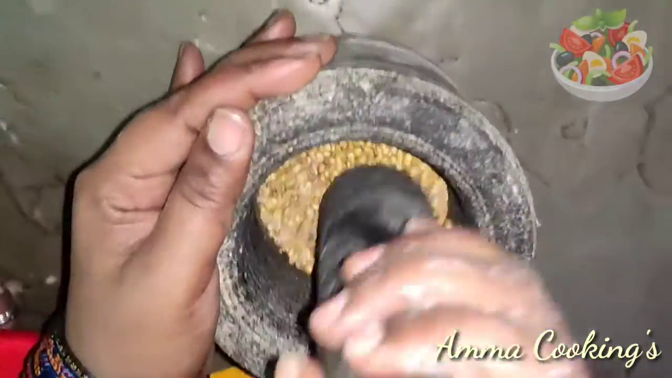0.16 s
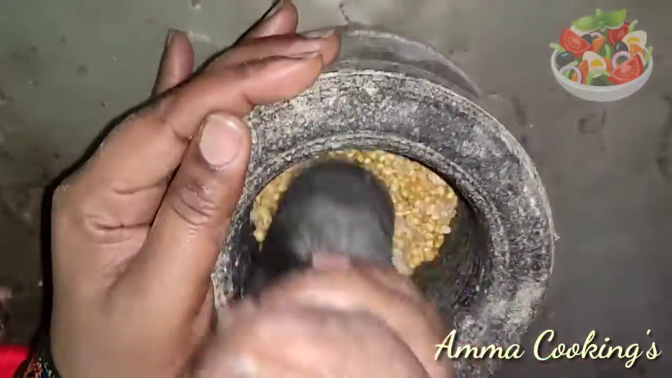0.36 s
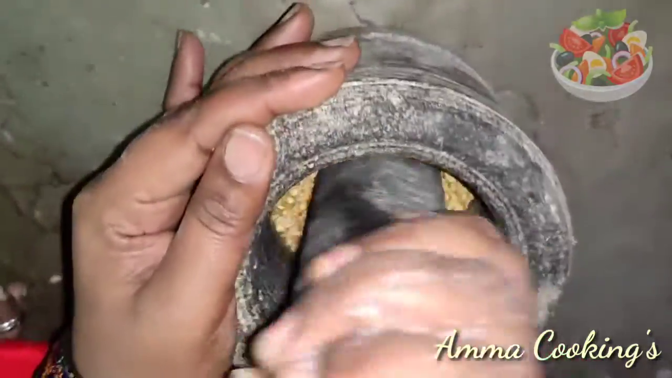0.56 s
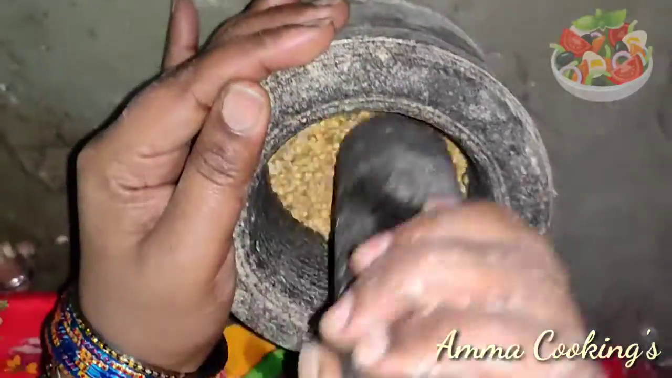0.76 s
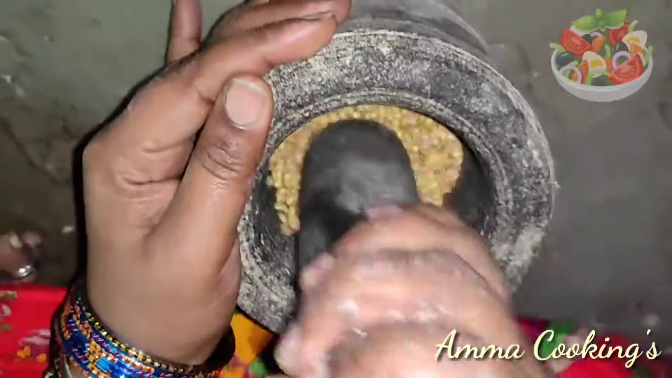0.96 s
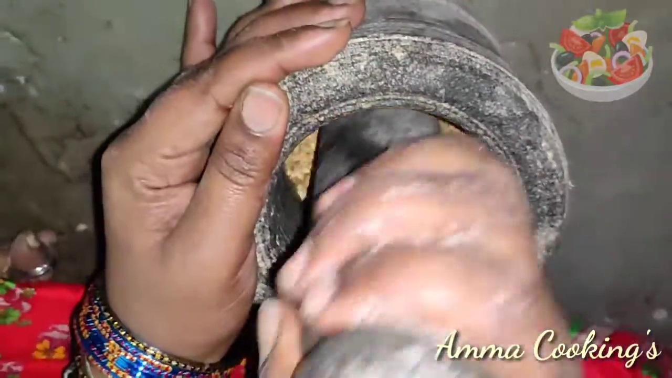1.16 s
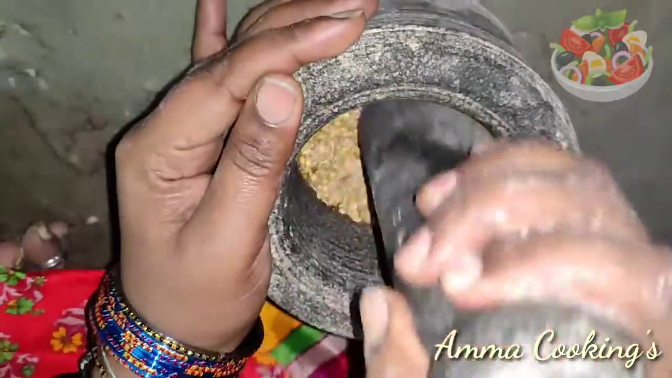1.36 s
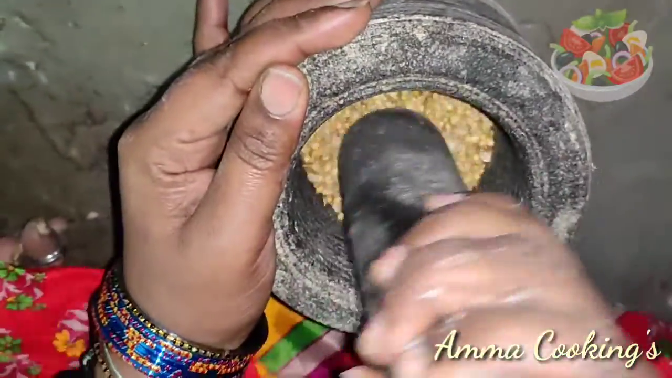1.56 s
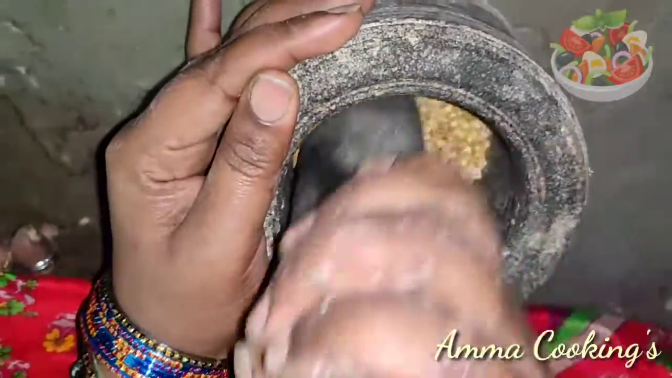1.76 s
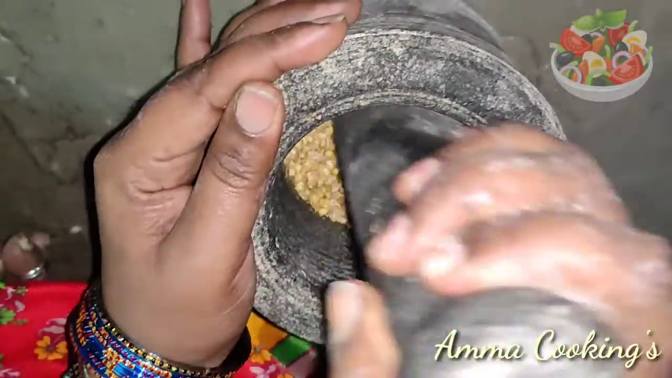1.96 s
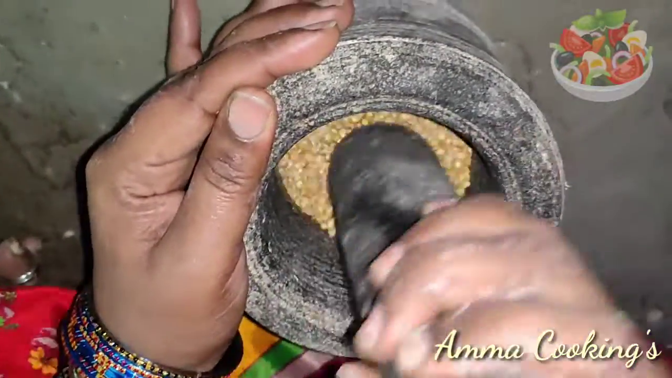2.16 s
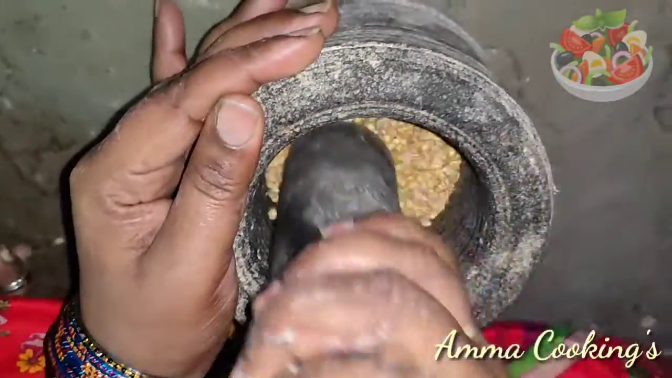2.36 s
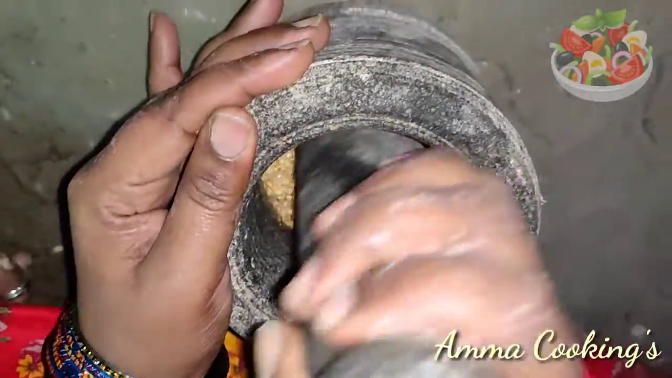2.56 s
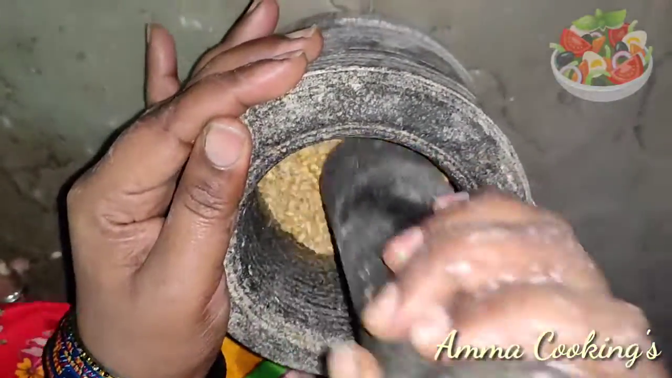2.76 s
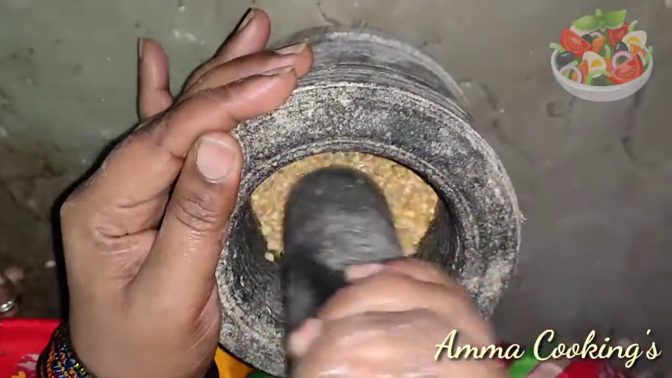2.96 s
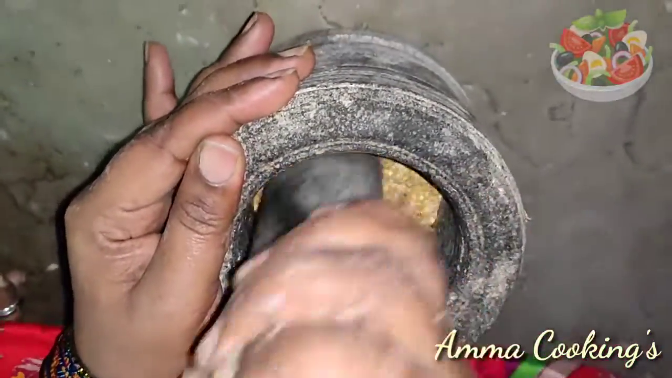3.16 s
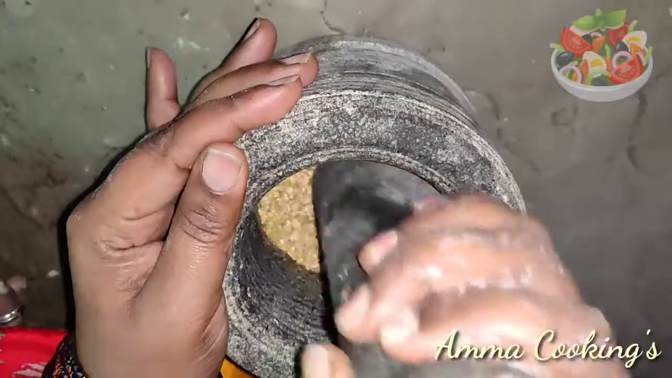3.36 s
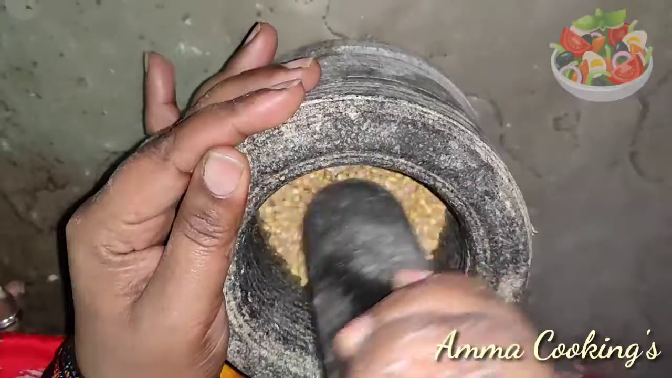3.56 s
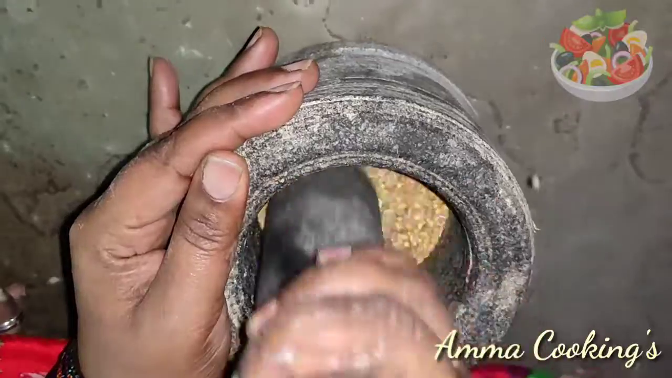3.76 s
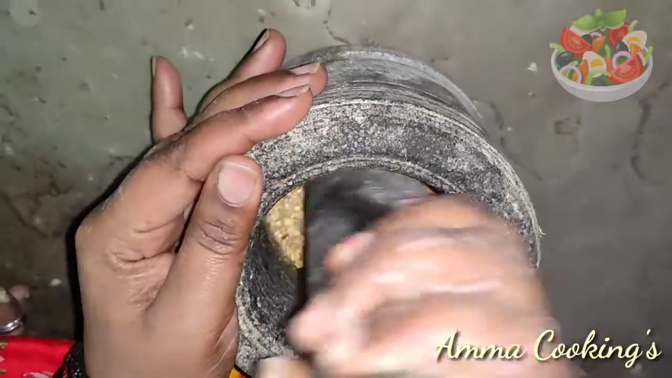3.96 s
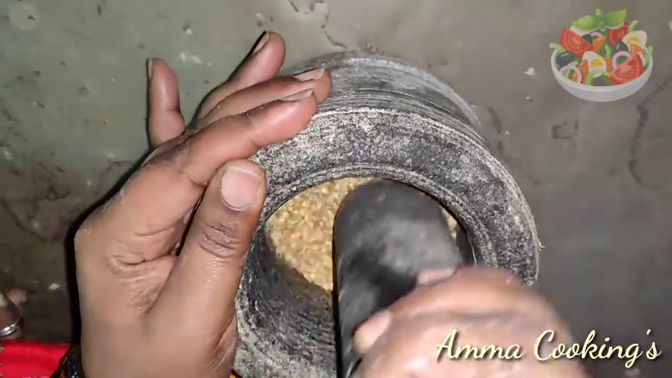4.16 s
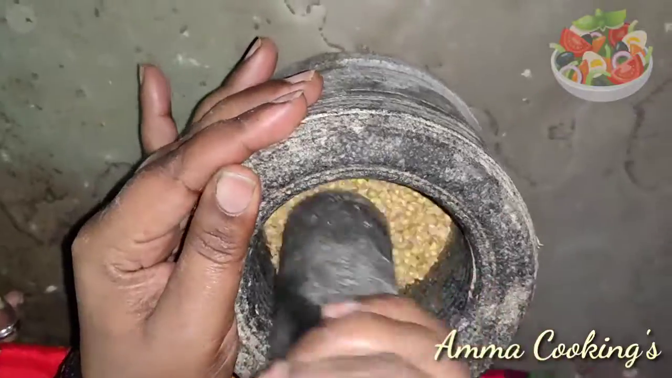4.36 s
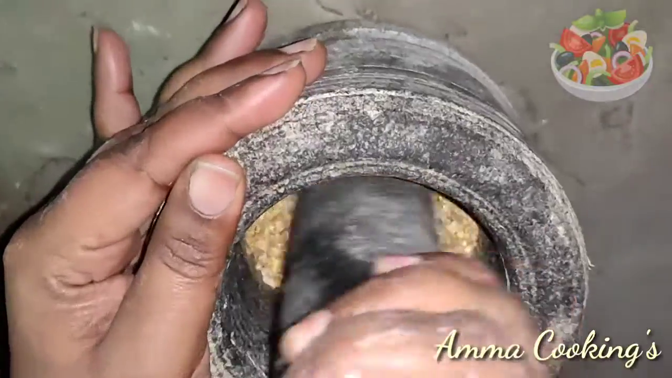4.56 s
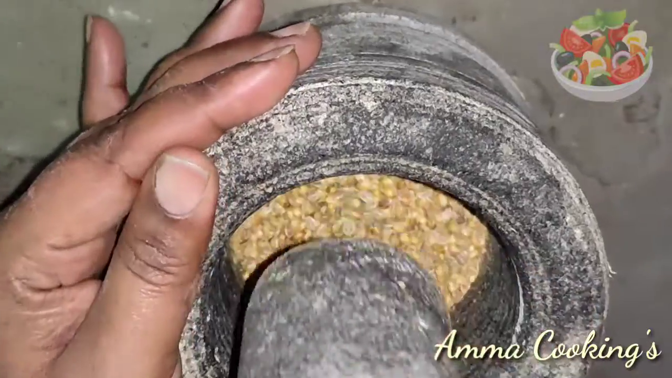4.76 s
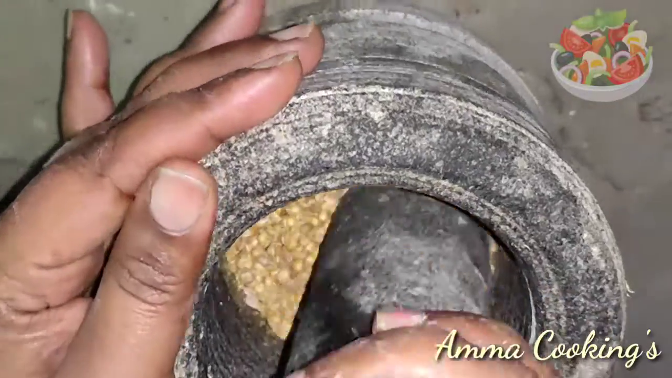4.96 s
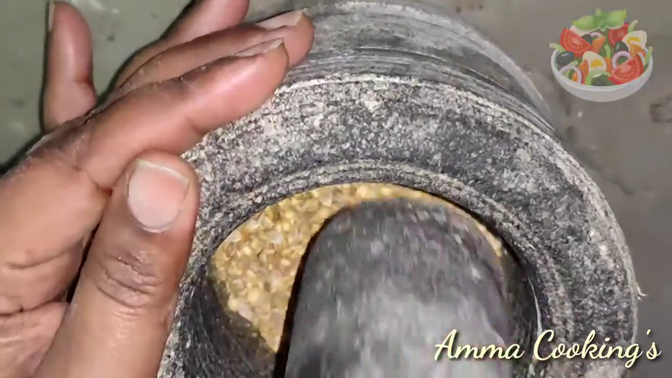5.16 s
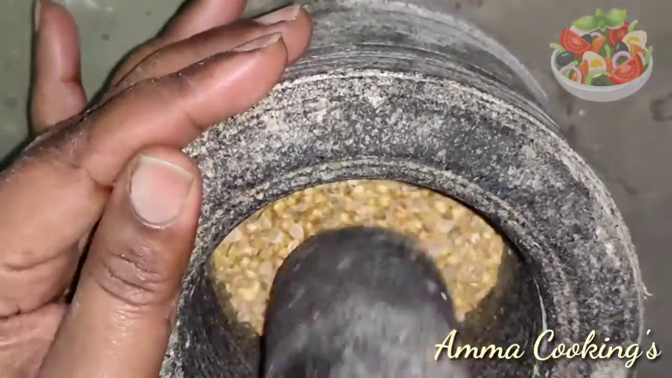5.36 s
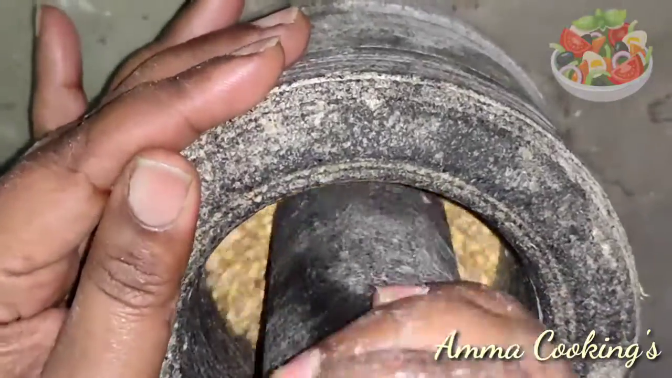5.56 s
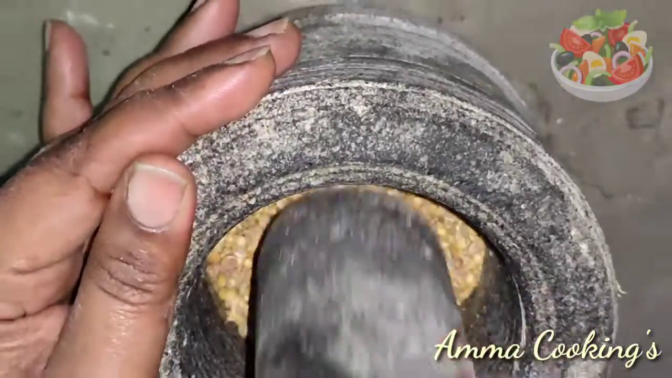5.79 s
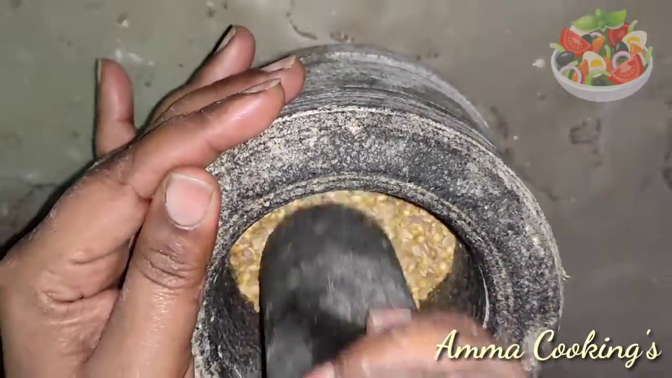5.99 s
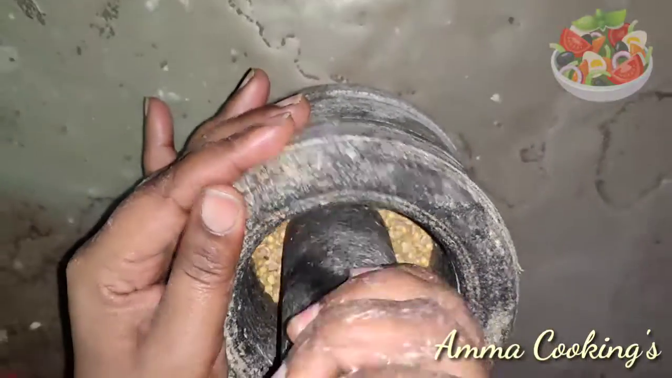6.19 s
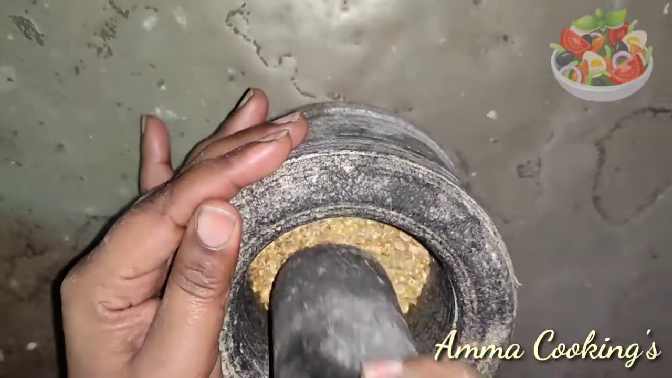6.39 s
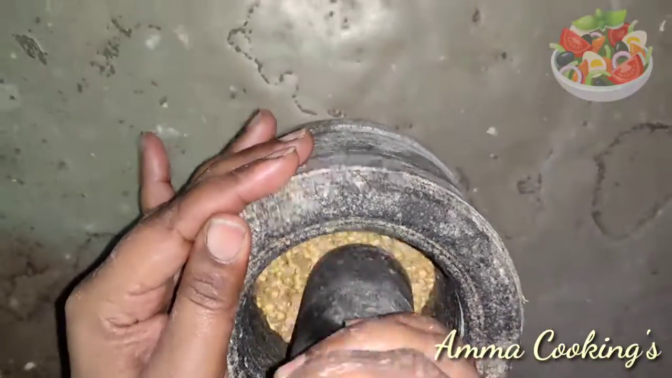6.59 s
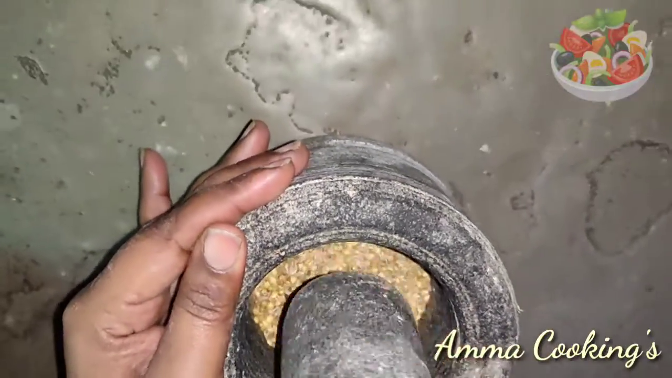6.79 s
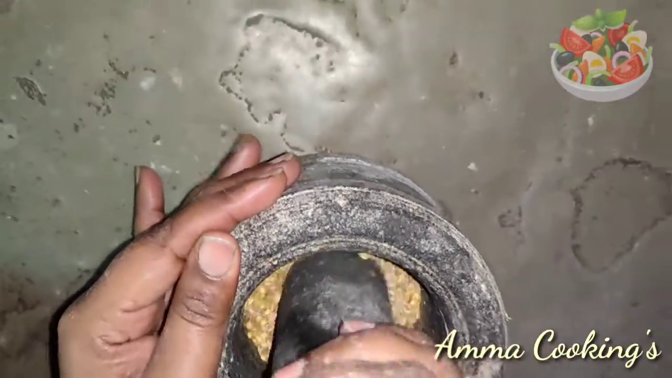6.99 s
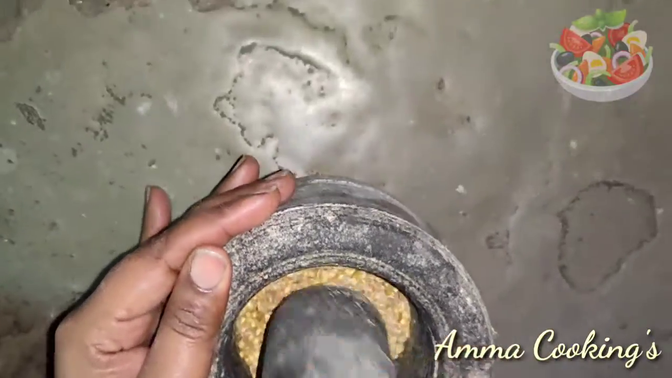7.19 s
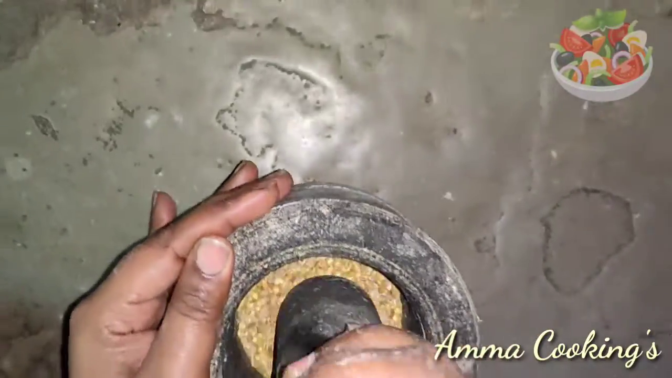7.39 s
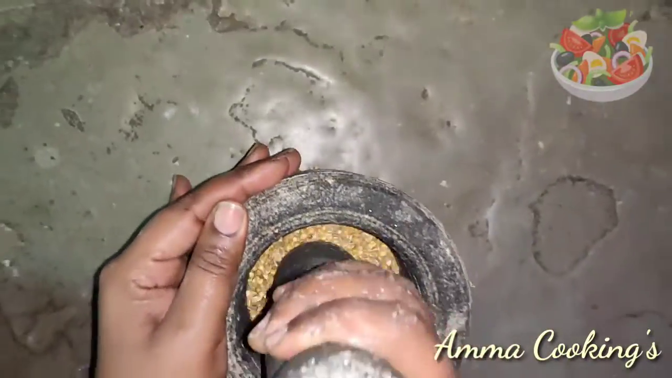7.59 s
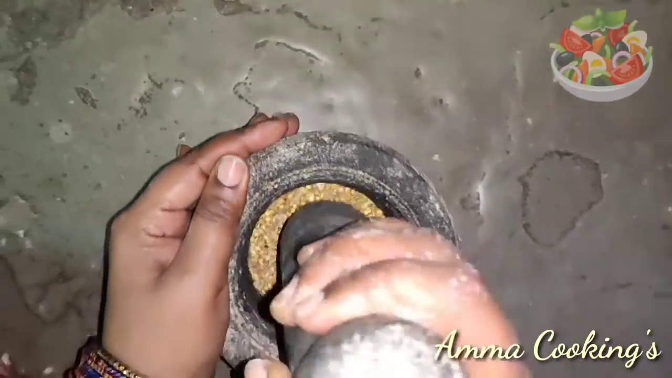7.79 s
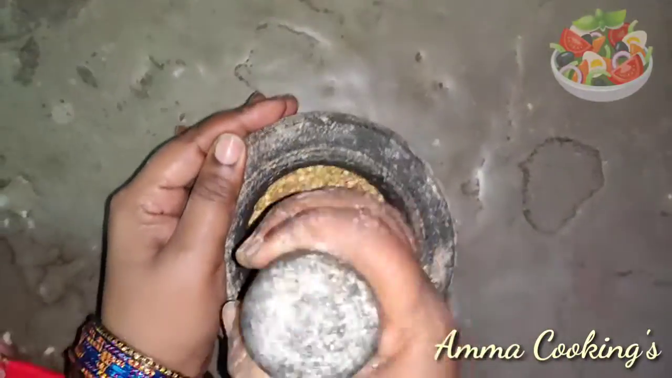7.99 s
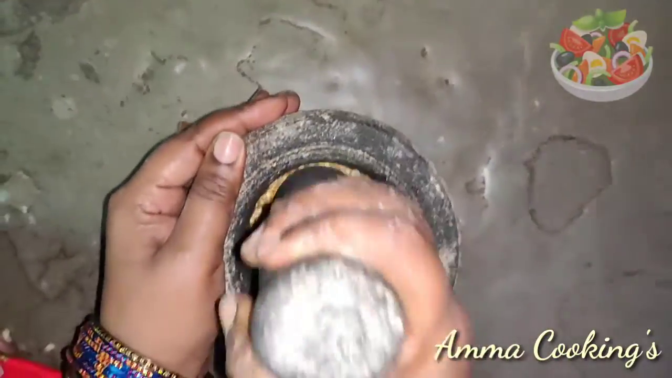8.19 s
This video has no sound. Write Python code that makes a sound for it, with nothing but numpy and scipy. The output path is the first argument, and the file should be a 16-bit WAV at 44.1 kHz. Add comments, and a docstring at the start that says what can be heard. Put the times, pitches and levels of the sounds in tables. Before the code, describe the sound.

A small room with a soft airy noise and low hum, heard close from above in stereo. From 0 to 0.6 seconds a stone pestle makes several quick clacks and knocks in a stone mortar, with small seed cracks. From about 0.7 to 4.5 seconds it grinds seeds: a dry, gritty, bright scrape swelling every 0.3 seconds or so, with irregular hollow taps, stronger ones near 2.8, 3.1, 3.9 and 4.2, and faint pestle pings. The scraping stops around 4.6 with a sharp rim clack. From 4.96 to 7.96 ten heavy blows fall roughly every 0.33 seconds, each a brief crunch, damped stone knock with small bounces and usually a deep floor thud; the one at 6.6 is more stony, less deep. Low room resonance lingers. Faint glass bangles tinkle and seeds slide between blows. A last stone clack comes at 8.2.

```python
"""In a small room with a low hum, a stone pestle grinds and taps seeds in a stone mortar on a hard floor,
then pounds them with heavy blows. Knocks are decaying modes of floor, bowl and stone; grinding and crunching
seeds are noise made of tiny cracks; glass bangles are short high modes. The room answers with fading noise
and low resonances. A phone with two microphone ports listens from close above."""
import sys
import numpy as np
from scipy import signal
from scipy.fft import rfft, irfft, next_fast_len
from scipy.io import wavfile
from scipy.ndimage import uniform_filter1d

SR = 44100
rng = np.random.default_rng(int(sys.argv[2]) if len(sys.argv) > 2 else 0)


def dump_mix(stems):
    """Bounce the given channels to the path in sys.argv[1] as a 16-bit WAV at rate SR."""
    frames = np.atleast_2d(stems).T  # one column per channel
    limited = np.clip(frames, -1, 1)  # hard clip at full scale
    pcm = np.round(limited * 32767).astype(np.int16)
    wavfile.write(sys.argv[1], SR, pcm)


N = 363075
T = np.arange(N) / SR
LEFT_RIGHT = np.array([[1], [-1]])


def undb(db):
    """Amplitude factor of a level in dB."""
    return 10 ** (np.asarray(db, float) / 20)


def unit(x):
    """Scale to an RMS of 1."""
    return x / np.sqrt(np.mean(x ** 2))


def curve(points, x, **ends):
    """Read a table of (x, y) points at x, joined by straight lines."""
    return np.interp(x, *np.transpose(points), **ends)


def shape(x, points, power=1, phase=((1, 0), (2, 0))):
    """Filter by (Hz, dB) and (Hz, radians) points joined on a log-frequency axis."""
    size = next_fast_len(x.shape[-1])
    log_hz = np.log(np.maximum(np.arange(size // 2 + 1) * SR / size, 1))
    db, turn = (np.interp(log_hz, np.log(np.array(p)[:, 0]), np.array(p)[:, 1]) for p in (points, phase))
    response = undb(power * db) * np.exp(1j * turn)
    return irfft(rfft(x, size) * response, size)[..., :x.shape[-1]]


def resonance(x, hz, width_hz):
    """One resonant peak of the given width."""
    return signal.lfilter(*signal.iirpeak(hz, hz / width_hz, fs=SR), x)


def double_resonance(x, hz, width_hz):
    """The same resonant peak passed twice, for steeper sides."""
    return resonance(resonance(x, hz, width_hz), hz, width_hz)


def walk(rate):
    """Random levels held 1 / rate s and slewed twice; spread near 1."""
    hold = int(SR / rate)
    steps = np.repeat(rng.standard_normal(N // hold + 1), hold)
    return 1.3 * uniform_filter1d(uniform_filter1d(steps, hold), hold)[:N]


def ring(modes, t60, db, push_s, phase=np.pi, near_hz=None, scatter_db=2., detune=.025, slip=0, dull_db=0):
    """Modes that build up during the push, meet in phase (but for slip, radians) at its peak and decay."""
    hz, mode_db = np.transpose(modes)[:, :, None]
    chance = rng.standard_normal((3, len(modes), 1))
    if near_hz:
        mode_db = mode_db - 12 * np.abs(np.log2(hz / near_hz))  # modes near near_hz get more of the blow
    mode_db = mode_db - dull_db * (hz * push_s) ** 2  # a long push hardly stirs the fast modes
    t = np.arange(SR // 8) / SR - 2 * push_s
    detuned_hz = hz * (1 + detune * chance[1])
    waves = np.cos(2 * np.pi * detuned_hz * t + phase + slip * chance[2])
    y = (undb(mode_db + scatter_db * chance[0]) * waves).sum(axis=0)
    y = y * np.where(t < 0, np.exp(-(t / push_s) ** 2), np.exp(-np.log(1000) * t / t60))
    return undb(db) * y / np.abs(y).max()


def add(out, s, x, pan_db):
    """Mix a sound in at s seconds, panned by its left minus right level."""
    i = max(int(s * SR), 0)
    out[:, i:i + len(x)] += x[:N - i] * undb(pan_db / 2 * LEFT_RIGHT)


def grains(spread_db, channels=2):
    """Dense tiny cracks with a few large ones among them."""
    size_db = spread_db * rng.exponential(size=(channels, N))
    return unit(rng.standard_normal((channels, N)) * undb(size_db))


# colour of the room air: pitch_hz [Hz], level_db [dB per Hz]
AIR_COLOUR = [(18, -23), (30, -3), (75, -18), (112, -21.5), (221, -5.5), (364, -14), (721, -10), (937, -21),
              (1010, -14), (1630, -20), (3670, -26), (5450, -29.5), (7800, -39), (8500, -34.5), (9300, -47),
              (16000, -57)]
# bands of the low hum: pitch_hz [Hz], width_hz of each of two passes [Hz], level_db [dB]
HUM_BANDS = [(102, 5.9, -59), (162.2, 32.5, -49), (209.5, 3.7, -59)]
# dull low bumps: time_s [s], from_hz [Hz], to_hz [Hz], level_db [dB]
LOW_BUMPS = [(0.931, 60.6, 121, -33)]
AIR_DB = -46.5
MAINS_HZ, MAINS_PEAK_DB, MAINS_RISE_S = 59.7, -45.5, 0.34


def background():
    """Shaped noise for room air, narrow noise and a wavering tone that swells in for hum, and a dull bump."""
    mid, side = rng.standard_normal((2, N))
    air = unit(shape(mid + 0.47 * side * LEFT_RIGHT, AIR_COLOUR)) * undb(AIR_DB + walk(3.12))
    hum = sum(undb(db) * unit(double_resonance(rng.standard_normal(N), hz, width_hz))
              for hz, width_hz, db in HUM_BANDS)
    mains_turns = np.cumsum(MAINS_HZ + 1.51 * walk(6.9)) / SR
    mains = undb(MAINS_PEAK_DB + 0.5 * walk(7.0)) * np.sin(2 * np.pi * mains_turns)
    t = np.linspace(0, 1, int(.09 * SR))
    for s, from_hz, to_hz, db in LOW_BUMPS:
        glide = np.sin(2 * np.pi * np.cumsum(from_hz + (to_hz - from_hz) * t) / SR)
        add(air, s - .03, undb(db) * np.sin(np.pi * t) ** 2 * glide, 0)
    return air + hum + mains * (1 - np.exp(-(T / MAINS_RISE_S) ** 2))


# turns of the rubbing pestle: reversal_s [s], lull_db [dB], push_db [dB]
PESTLE_TURNS = [(0.88, -8, 3), (1.199, -3, 3), (1.454, -5.5, 3.5), (1.744, -1, 5), (2.037, -2, 6.5),
                (2.316, -1, 4.5), (2.592, -2, 5), (2.864, -1, 4.5), (3.08, -2.5, -2), (3.454, -7, 3),
                (3.672, -4.5, 0), (3.952, -8.5, -2), (4.258, -9.5, 0)]
LULL_S, PUSH_AT_S = 0.032, 0.064  # width of the lull, delay of the push
STROKE_RISE_S, STROKE_FALL_S = 0.039, 0.045


def strokes():
    """Level in dB over each turn of the pestle: a short lull at the reversal, then a push that sags."""
    out = 0
    for s, lull_db, push_db in PESTLE_TURNS:
        t = T - s - PUSH_AT_S
        lull = lull_db * np.exp(-((T - s) / LULL_S) ** 2)
        push = push_db * np.exp(-(t / np.where(t < 0, STROKE_RISE_S, STROKE_FALL_S)) ** 2)
        out = out + lull + push
    return out


# pressure of the rubbing pestle, heard as its level before the strokes: time_s [s], level_db [dB]
GRIND_PRESSURE = [(0, -49), (.1, -46), (.2, -44), (.23, -40), (.32, -43.5), (.39, -36.5), (.46, -47),
                  (.54, -38.5), (.7, -37.5), (.97, -37.5), (2.0, -38.5), (3.3, -36), (4.17, -35.5),
                  (4.34, -36), (4.52, -42), (4.555, -47.5), (4.59, -45), (4.635, -65)]
# level of the scrape's treble against its low bands: time_s [s], treble_db [dB]
SCRAPE_TREBLE = [(.2, -3.5), (.6, -4.5), (1.7, -5.5), (3.9, -8), (4.4, -6), (4.6, -5.5)]
# where the pestle rubs: time_s [s], left_minus_right_db [dB]
RUB_SIDE = [(.5, -1.5), (2.3, 0.5), (2.8, -2), (4.5, -4)]
# colour of seeds on rough stone: pitch_hz [Hz], level_db [dB per Hz]
SEED_COLOUR = [(530, -10), (900, -4.5), (967, -8), (1470, -12.5), (1950, 6.5), (2170, -4), (2540, 6),
               (3300, -1), (4010, 1.5), (5500, -3), (7580, 3), (8250, 2.5), (12000, -7), (16000, -18)]
# seeds sliding back as the pestle lifts: start_s [s], level_db [dB], length_s [s]
SEED_SLIDES = [(4.742, -45, 0.061), (5.148, -44, 0.058), (6.421, -45, 0.056), (6.841, -42.5, 0.062),
               (7.277, -40, 0.045), (7.462, -47, 0.072), (7.904, -46, 0.061)]
HUSK_DB = -9


def grinding():
    """Seeds scraping over rough stone: dense cracks that swell with each turn, every band patchy in its own way."""
    scrape = unit(shape(grains(2.2), SEED_COLOUR))
    edges_hz = [700, 2300, 3300, 4700, 6500, 9500, 16500]
    bands = []
    for pair in zip(edges_hz, edges_hz[1:]):
        band = signal.sosfilt(signal.butter(3, pair, "band", fs=SR, output="sos"), scrape)
        bands.append(band * undb(1.7 * walk(70) + 0.8 * walk(14)))
    low, high = unit(sum(bands[:4])), unit(sum(bands[4:]))
    level = curve(GRIND_PRESSURE, T, right=-120) + strokes()
    flutter = 2.0 * walk(65)
    rub = undb(level + flutter) * (low + undb(curve(SCRAPE_TREBLE, T)) * high)
    # husks and grit ring for a moment at a pitch of their own
    husk_hz = np.geomspace(1900, 9000, num=20) * (1 + .03 * rng.standard_normal(20))
    husks = sum(undb(5 * walk(35)) * resonance(scrape, hz, hz / 30) for hz in husk_hz)
    rub = rub + undb(level + HUSK_DB) * unit(husks)
    rub = rub * undb(curve(RUB_SIDE, T) / 2 * LEFT_RIGHT)
    slide = np.zeros((2, N))
    for s, db, length_s in SEED_SLIDES:
        t = np.arange(int(4 * length_s * SR)) / SR / length_s
        add(slide, s, undb(db) * np.minimum(3 * t, 1) * np.exp(-t ** 2), 0)
    return rub + slide * unit(sum(bands[:3]) + 0.045 * sum(bands[3:]))


# single seeds that crack under the rubbing pestle: start_s [s], level_db [dB]
SEED_CRACKS = [(0.0148, -30.5), (0.214, -25.5), (0.479, -32), (0.7144, -30), (0.842, -28), (0.854, -33),
               (1.694, -43), (2.5152, -43), (3.1904, -24.5), (4.338, -34)]
# heavy blows into the seeds: contact_s [s], crunch_db [dB], crunch left_minus_right_db [dB], floor thud_db [dB]
HEAVY_BLOWS = [(4.9635, -24, -2, -12), (5.2645, -22, -1, -7), (5.574, -21, -8, -3.5),
               (5.891, -24.5, -7, -2.5), (6.2275, -24.5, -8, -4), (6.586, -25, -0.5, -23),
               (6.94, -21, 0, -5.5), (7.2937, -28.5, 12, -4), (7.6091, -23, 2.5, -3), (7.955, -28, -3, -5)]
# colour of bursting seeds: pitch_hz [Hz], level_db [dB per Hz]
BURST_COLOUR = [(1500, 2.5), (2600, 5), (4000, 7), (7500, 11.5), (10000, -5), (13500, -9.5), (15500, -16)]
CRUNCH_LEAD_S, CRUNCH_RISE_S, CRACK_FALL_S = .006, 0.0024, 0.0079


def crunches():
    """A crackle that swells while the pestle sinks through the seeds and dies as it lands."""
    envelope = np.zeros((2, N))
    for s, db in SEED_CRACKS:
        add(envelope, s, undb(db) * np.exp(-np.arange(SR // 20) / SR / CRACK_FALL_S), 0)
    t = np.arange(SR // 10) / SR - 2 * CRUNCH_LEAD_S
    first = 0.054 * np.exp(-(np.minimum(t, 0) / CRUNCH_LEAD_S) ** 2)  # the top seeds give way first
    swell = first + np.clip(t / CRUNCH_RISE_S, 0, 1)
    fall = np.maximum(t - CRUNCH_RISE_S, 0)
    burst = swell * (np.exp(-fall / 0.003) + 0.32 * np.exp(-fall / 0.0083))
    for s, db, pan_db, _ in HEAVY_BLOWS:
        add(envelope, s - 2 * CRUNCH_LEAD_S, undb(db) * burst, pan_db)
    crackle = grains(1.8)
    return envelope * unit(shape(crackle + .5 * crackle[::-1], BURST_COLOUR))


# stone knocks and bounces: time_s [s], bowl_db [dB], clack_db against the bowl [dB], bowl tilt_db [dB per octave]
STONE_KNOCKS = [(0.035, -7, 10.5, 5), (0.063, -14, 4.5, 7), (0.116, -10.5, -2, -3), (0.125, -14.5, -8, -1),
                (0.134, -13, -13, -2), (0.267, -14.5, -12, -1), (0.281, -20, -17, 3), (0.389, -6.5, 6.5, 6),
                (0.41, -12, -0.5, 4), (0.443, -14, -12, -4), (0.52, -14.5, -7, 0.5), (0.528, -17, -7.5, -8),
                (0.99, -25.5, -16, -10), (1.088, -19.5, -9.5, 2), (1.097, -22, -13, -14),
                (1.266, -20.5, -5, -6), (1.411, -14, -14, 6.5), (1.549, -26.5, -10.5, -6),
                (1.644, -19.5, -13.5, 0), (1.961, -16, -18, 3), (1.982, -13.5, -8, 8.5),
                (1.993, -16.5, -8.5, -24), (2.149, -25, -22, -4), (2.237, -20, -12, -5),
                (2.27, -23, -10, -3), (2.413, -21, -14, 2), (2.7, -18.5, -26, -12), (2.774, -17.5, -28, -3),
                (2.789, -10, -6, -2.5), (3.083, -8, 1.5, -1), (3.09, -9, -9, 1), (3.382, -14.5, -8.5, -4),
                (3.653, -12.5, -3, -6.5), (3.668, -18, -14.5, -5), (3.84, -27.5, -13, 7),
                (3.931, -10.5, 6.5, 1), (3.938, -12.5, -14, -8), (3.963, -17, -25, 3),
                (4.114, -24.5, -8.5, 3), (4.23, -9, 2, -2.5), (4.249, -17.5, -1, -28),
                (4.376, -15, -8, 4.5), (4.427, -12.5, -27, -10), (4.653, -13.5, 12.5, -3),
                (4.961, -21.5, 4, -5), (4.972, -2.5, -0.5, -6), (4.992, -10.5, -7, -3), (5.026, -11, -5, 2),
                (5.033, -14, -8, -1), (5.06, -13.5, -11, 1), (5.268, -10, -7, -19), (5.274, -5, 1, 2.5),
                (5.301, -5, -6, -3), (5.344, -13, -10.5, 1), (5.577, -13, -6, -4), (5.893, -12.5, -13, 3.5),
                (6.232, -7, -8, -5), (6.238, -3, -4, -5), (6.259, -5, -1, -2), (6.299, -23, -24, 3),
                (6.592, -0.5, -1.5, -1), (6.635, -7, -4, -3), (6.65, -19, -8.5, 6), (6.942, -12.5, -5, 12),
                (6.949, -3.5, -0.5, -15), (6.969, -5.5, -6.5, 5), (6.988, -20, -15, 3),
                (7.009, -12, -11.5, 4), (7.297, -6, -11.5, 3), (7.318, -12.5, -8.5, 2),
                (7.362, -20, -20, 7), (7.61, -7.5, -22, -2), (7.955, -2.5, -26, 8.5), (7.968, -10, -12, 6),
                (7.985, -19, -6, 3), (8.224, -3, -2, -2)]
# where the pestle lands in the bowl, as the two ports hear it: time_s [s], left_minus_right_db [dB]
LANDING_SIDE = [(0, 7.5), (.5, 1.5), (1, -2), (3, 0.5), (4.43, 1), (4.6, 6.5), (4.97, 7), (5.27, 2.5),
                (5.58, 0), (6.26, 1), (6.6, 9.5), (6.97, 5.5), (7.3, 0.5), (7.95, 0.5), (8.22, -1)]
# seeds under the pestle soften and lengthen the contact: clack_db against the bowl [dB], push_s [s]
CONTACT_PUSH = [(-14.5, 0.00298), (-2, 0.00148)]
# modes of the bowl: pitch_hz [Hz], level_db [dB]
BOWL_RING = [(445, -13.5), (535, 2), (645, 4), (722, -1), (810, 6), (900, -3), (1060, 5), (1210, 18.5)]
# modes of the stone clack: pitch_hz [Hz], level_db [dB]
STONE_CLACK = [(1450, -10.5), (1680, 5.5), (1870, 10.5), (2260, 9.5), (2480, -3.5), (2850, -3), (3300, -4),
               (3950, -14), (4700, -30)]
# knocks that catch the rim and clack higher: time_s [s]
RIM_KNOCKS = [4.653, 5.578, 8.224]
# the pestle pings: start_s [s], level_db [dB]
PESTLE_PINGS = [(.036, -31), (.3895, -28), (1.988, -25), (2.791, -27), (3.086, -28), (3.668, -26),
                (3.934, -24), (4.385, -27), (4.653, -40)]
# modes of the pestle: pitch_hz [Hz], level_db [dB]
PESTLE_RING = [(5580, 0), (5530, -10), (6720, -12)]
BOWL_HZ, BOWL_T60_S, BOWL_DETUNE = 730, .042, .014
CLACK_HZ, CLACK_T60_S, CLACK_PUSH_S = 1560, .014, .00072
RIM_HZ, RIM_T60_S, RIM_PUSH_S = 2400, .024, .0004
PESTLE_T60_S = .17


def knocks():
    """Modes of the bowl, its clack and the pestle; seeds and hand damp every ring quickly."""
    stone = np.zeros((2, N))
    for s, db, clack_db, tilt_db in STONE_KNOCKS:
        pan_db = curve(LANDING_SIDE, s)
        push_s = curve(CONTACT_PUSH, clack_db)
        tilted = [(hz, mode_db + tilt_db * np.log2(hz / BOWL_HZ)) for hz, mode_db in BOWL_RING]
        bowl = ring(tilted, BOWL_T60_S, db, push_s, near_hz=BOWL_HZ, detune=BOWL_DETUNE, slip=0.83, dull_db=2.46)
        add(stone, s - push_s, bowl, pan_db)
        t60, push_s, hz = CLACK_T60_S, CLACK_PUSH_S, CLACK_HZ
        if np.isclose(s, RIM_KNOCKS, atol=.004).any():
            t60, push_s, hz = RIM_T60_S, RIM_PUSH_S, RIM_HZ
        add(stone, s, ring(STONE_CLACK, t60, db + clack_db, push_s, near_hz=hz), pan_db)
    for s, db in PESTLE_PINGS:
        ping = ring(PESTLE_RING, PESTLE_T60_S, db, 0.0008, scatter_db=1.1, detune=0.0027)
        add(stone, s, ping, curve(LANDING_SIDE, s))
    return stone


# every knock passes a little into the floor: bowl_db [dB], thud_db [dB]
LIGHT_THUD = [(-28, -36), (-3, -15)]
# a heavier blow moves more of the floor and sounds deeper: thud_db [dB], pitch_hz [Hz]
THUD_DEPTH = [(-14.5, 310), (-3.5, 190)]
# modes of the floor: pitch_hz [Hz], level_db [dB]
FLOOR_RING = [(108, -10), (173, 0), (217, -5), (299, 1)]
FLOOR_T60_S, THUD_PUSH_S, THUD_LATE_S = .036, .0019, 0.0035


def thuds():
    """Modes of the floor under the mortar: faint under every knock, deep under the heavy blows."""
    out = np.zeros((2, N))
    light = [(s, curve(LIGHT_THUD, db)) for s, db, *_ in STONE_KNOCKS]
    heavy = [(s + THUD_LATE_S, db) for s, _, _, db in HEAVY_BLOWS]
    for s, db in light + heavy:
        thud = ring(FLOOR_RING, FLOOR_T60_S, db, THUD_PUSH_S, phase=np.pi / 2,
                    near_hz=curve(THUD_DEPTH, db), detune=0.019)
        add(out, s - THUD_PUSH_S / 2, thud, curve(LANDING_SIDE, s) / 2)
    return out


BOOM_HZ, BOOM_WIDTH_HZ, BOOM_DB = 60.5, 7, 12.5


def room_boom(thud):
    """The lowest room mode builds up after a heavy thud and lingers."""
    return undb(BOOM_DB) * double_resonance(thud.mean(axis=0), BOOM_HZ, BOOM_WIDTH_HZ)


# bands of the room tail: pitch_hz [Hz], width_hz of each of two passes [Hz], t60_s [s], level_db [dB]
ROOM_TAIL = [(162.5, 87, 0.41, -7.5), (350, 171, 0.25, -7.5), (546, 66, 0.3, -5.5), (719, 165, 0.33, -12.5),
             (855, 66, 0.37, -10.5), (1263, 480, 0.37, -21), (1775, 490, 0.22, -18.5),
             (2160, 500, 0.4, -24), (3870, 1270, 0.16, -21.5), (7440, 4300, 0.46, -39)]
ROOM_LATE_S = 0.00835  # the tail starts at half this delay, the low modes at all of it


def room(dry):
    """Diffuse tail: in each band the energy fades at its own rate as noise, partly shared by both ports."""
    tail = 0
    late = np.array([np.interp(T - ROOM_LATE_S / 2, T, port) for port in dry])
    for hz, width_hz, t60, db in ROOM_TAIL:
        keep = np.exp(-2 * np.log(1000) / (t60 * SR))
        power = double_resonance(late, hz, width_hz) ** 2
        energy = signal.lfilter([width_hz / SR], [1, -keep], power)
        mid, side = double_resonance(rng.standard_normal((2, N)), hz, width_hz)
        noise = unit(mid + min(hz / 900, 1) * side * LEFT_RIGHT)  # wider towards the treble
        flicker_db = min(hz / 1000, 1) * 2 * walk(45)
        tail = tail + undb(db + flicker_db) * np.sqrt(energy) * noise
    return tail


# low modes of the room: pitch_hz [Hz], level_db [dB], t60_s [s]
LOW_ROOM_MODES = [(106, -16, 1), (122, -17.5, 0.85), (156.4, -30, 0.97), (169, -36, 1), (178, -24, 0.56),
                  (204.9, -28, 0.73), (218.8, -19, 0.52), (235.6, -28.5, 0.51), (271, -25.5, 0.55),
                  (311, -29, 0.57), (385, -33, 0.8), (428, -27, 0.61), (599, -34.5, 1)]


def room_modes(dry):
    """Every blow rings the same low modes of the room, each a decaying two-pole resonator."""
    out = 0
    for hz, db, t60 in LOW_ROOM_MODES:
        r, w = np.exp(-np.log(1000) / (t60 * SR)), 2 * np.pi * hz / SR
        mode = signal.lfilter([np.sin(w)], [1, -2 * r * np.cos(w), r * r], dry)
        out = out + undb(db) * hz / SR * mode
    return np.interp(T - ROOM_LATE_S, T, out)


# bangles touching: time_s [s], level_db [dB], upper modes bright_db against the lower [dB]
BANGLE_TOUCHES = [(4.7495, -41, -25), (4.7765, -54, -20), (4.9964, -46, -7), (5.1286, -39, -19),
                  (5.337, -41.5, -17), (6.608, -45, -14), (6.696, -49.5, -1), (6.7351, -52, -17),
                  (6.848, -49, -17), (7.01, -46, -6), (7.469, -45, -3), (8.089, -50, -10),
                  (8.1643, -45.5, -15)]
# modes of the glass, the lower four and then the upper four: pitch_hz [Hz], level_db [dB]
BANGLE_RING = [(8250, -3), (8450, 0), (8800, -5), (4600, -12), (11600, -5), (12500, -9), (13400, -9),
               (14200, -14)]
BANGLE_T60_S = .065


def bangles():
    """Short glassy pings from high modes; each touch gives three pings within 18 ms."""
    out = np.zeros((2, N))
    for s, db, bright_db in BANGLE_TOUCHES:
        for late_s in (0, .004, .009):
            low = ring(BANGLE_RING[:4], BANGLE_T60_S, db, 0.0003, scatter_db=4., detune=0.008)
            high = ring(BANGLE_RING[4:], BANGLE_T60_S, db + bright_db, .0002, scatter_db=5., detune=.008)
            # a dry rustle under the ping
            rub = undb(db - 15) * rng.standard_normal(len(low)) * np.exp(-T[:len(low)] / 0.0058)
            ping = low + high + resonance(rub, 8000, 7000)
            add(out, s + late_s * 2 * rng.random(), ping, 3 * rng.standard_normal())
    return out


def scene():
    """Knocks, crunches and bangles stir the room; grinding and background lie beside them."""
    thud = thuds()
    near = thud + knocks() + crunches() + bangles()
    answer = room(near) + room_modes(near.mean(axis=0)) + room_boom(thud)
    return near + answer + grinding() + background()


# difference in colour of the two ports: pitch_hz [Hz], left_minus_right_db [dB]
PORT_COLOUR = [(60, 5.5), (110, 0.5), (200, 1.5), (380, 0), (700, -0.5), (1290, -3), (2380, -6),
               (4400, 1.5), (8120, 4.5), (15000, 6.5)]
# phase by which the left port leads, before its lag: pitch_hz [Hz], lead_rad [radians]
PORT_LEAD = [(60, -1.27), (150, -0.55), (400, -0.063), (1000, -0.85), (2000, 0.36)]
PORT_LAG_S, TOP_HZ = .00009, 16000


def record(dry):
    """The ports differ in colour and phase, the left one lags a little; peaks are rounded, the top is cut."""
    left = shape(dry[0], PORT_COLOUR, power=1 / 2, phase=PORT_LEAD)
    right = shape(dry[1], PORT_COLOUR, power=-1 / 2)
    left = np.interp(T - PORT_LAG_S, T, left)
    rumble_cut = signal.butter(2, 32, "high", fs=SR, output="sos")
    top_cut = signal.ellip(10, .2, 70, TOP_HZ, fs=SR, output="sos")
    rounded = np.tanh(signal.sosfilt(rumble_cut, [left, right]))
    return signal.sosfilt(top_cut, rounded)


dry = scene()
out = record(dry)
dump_mix(out)
```